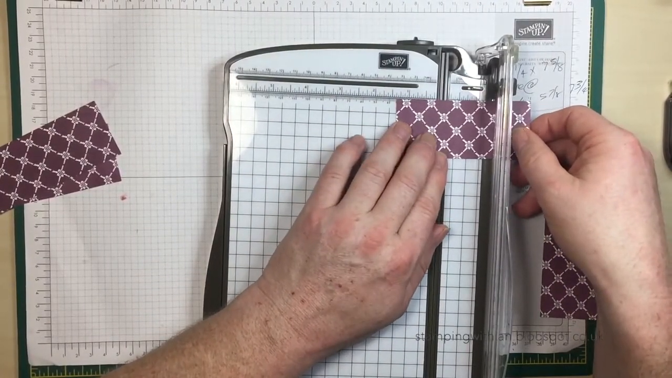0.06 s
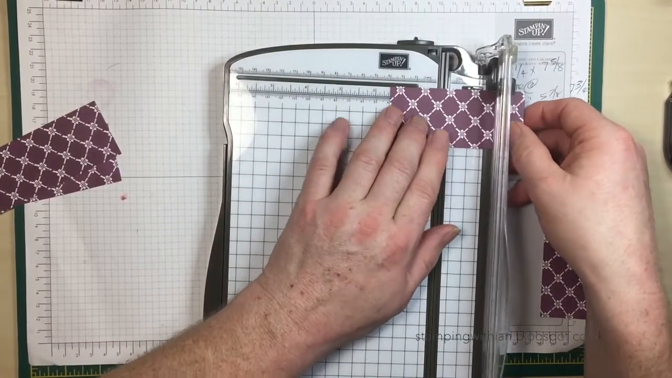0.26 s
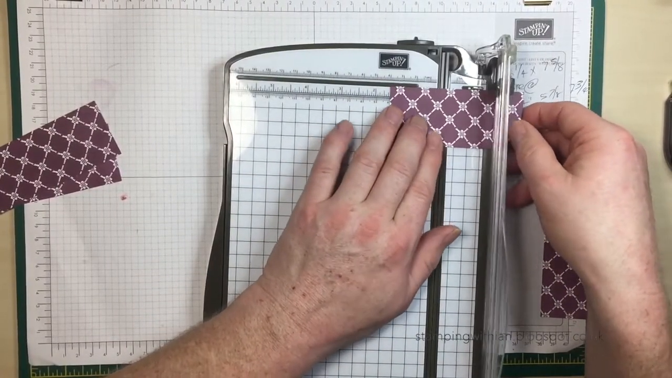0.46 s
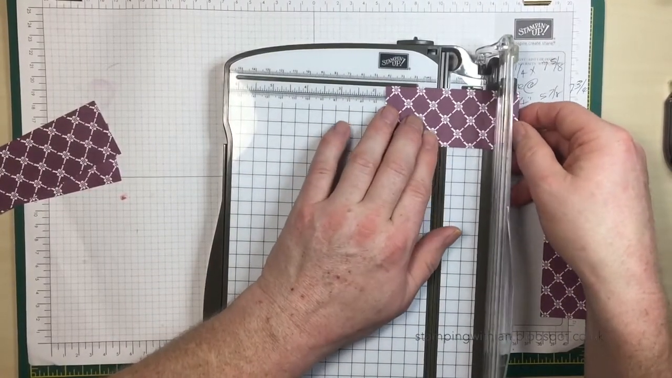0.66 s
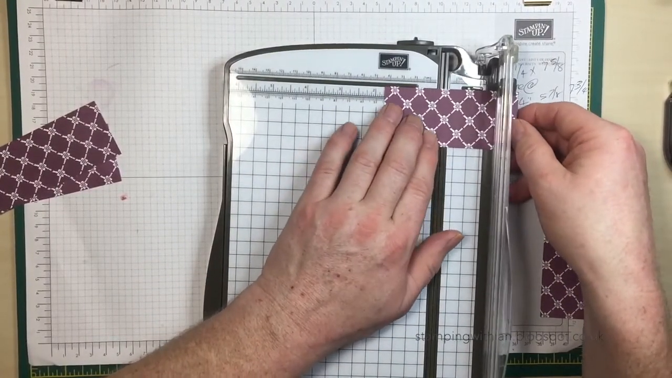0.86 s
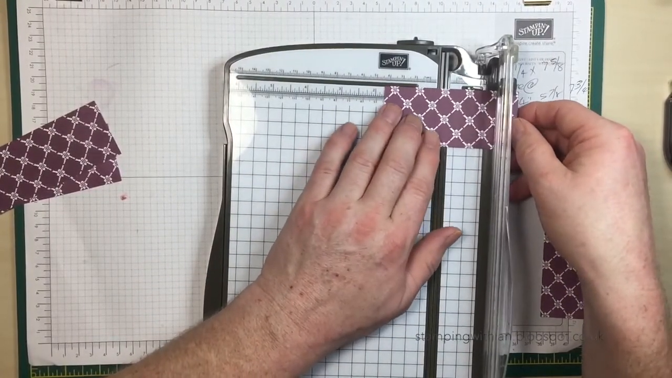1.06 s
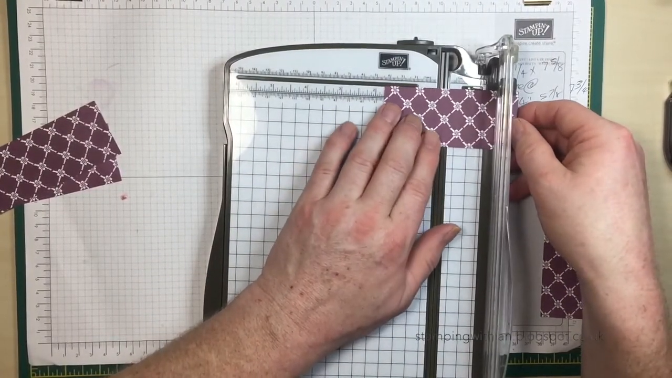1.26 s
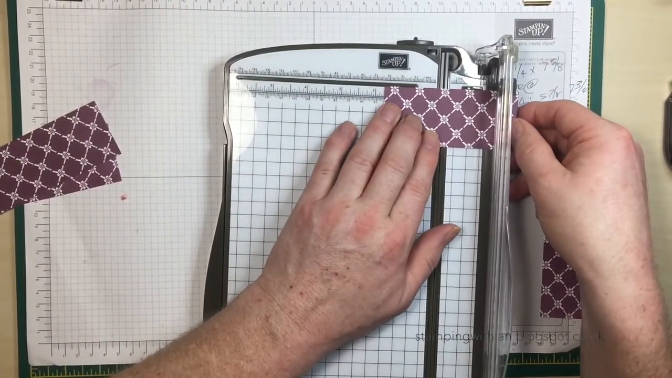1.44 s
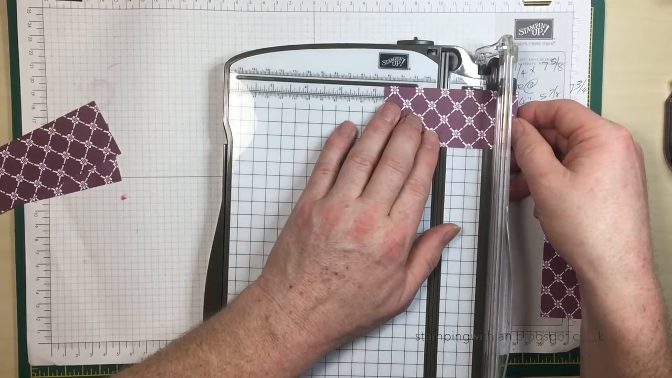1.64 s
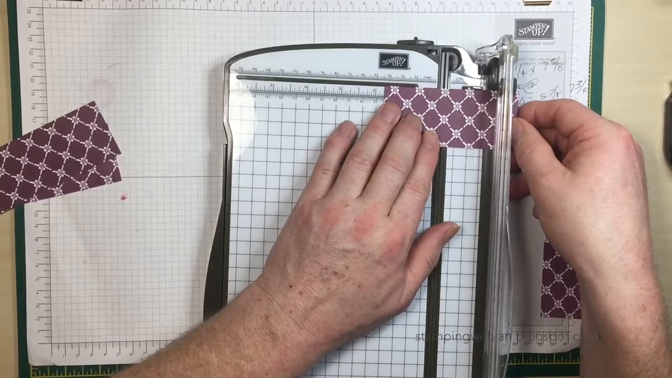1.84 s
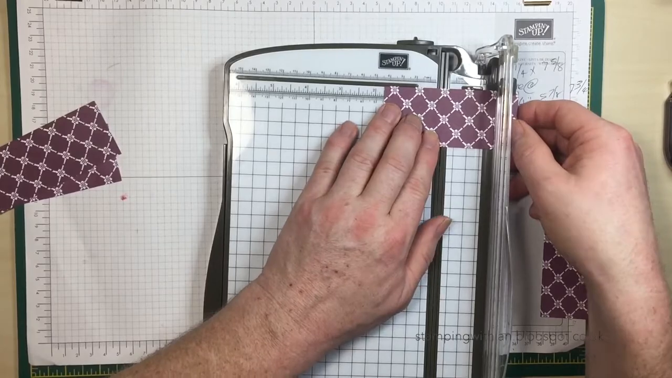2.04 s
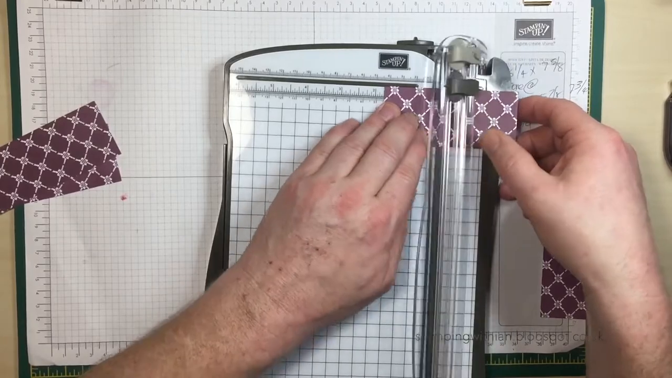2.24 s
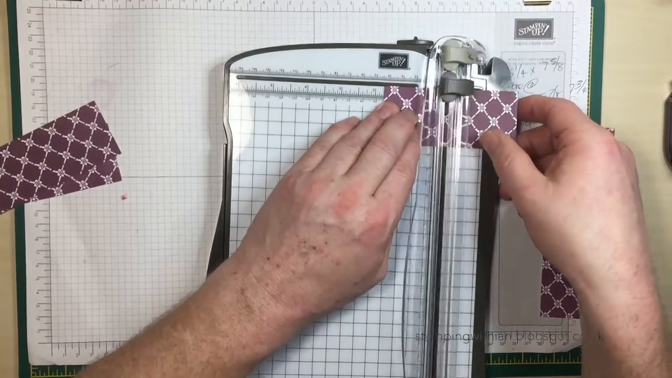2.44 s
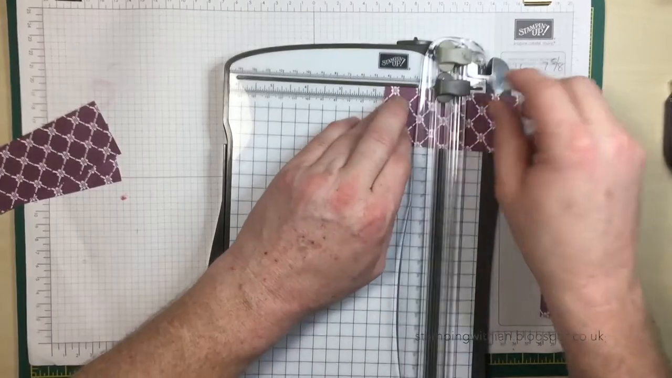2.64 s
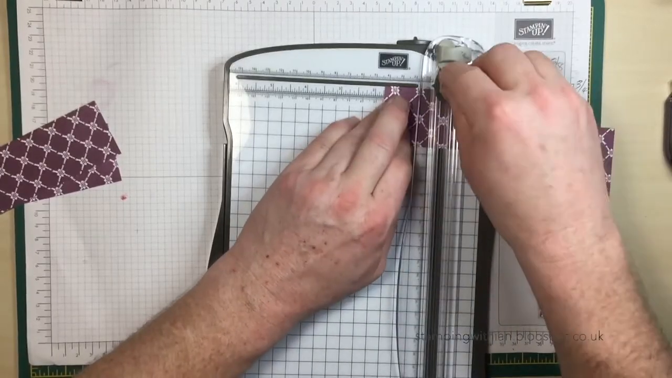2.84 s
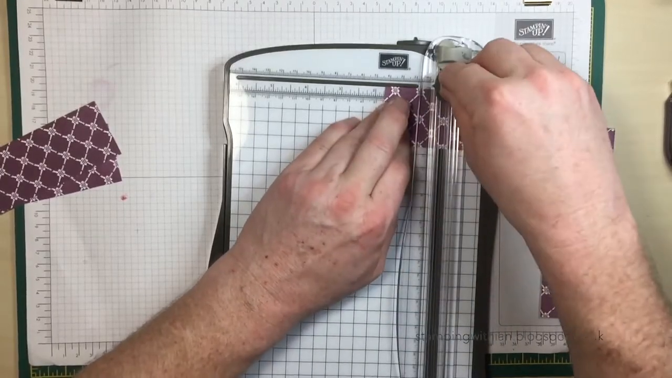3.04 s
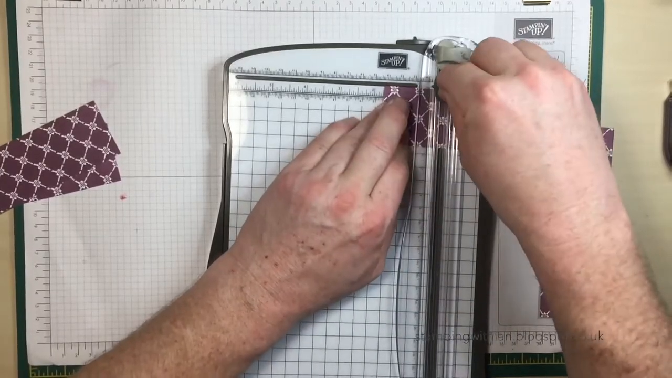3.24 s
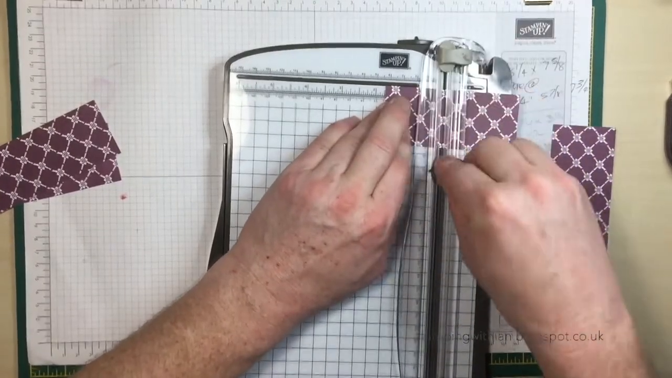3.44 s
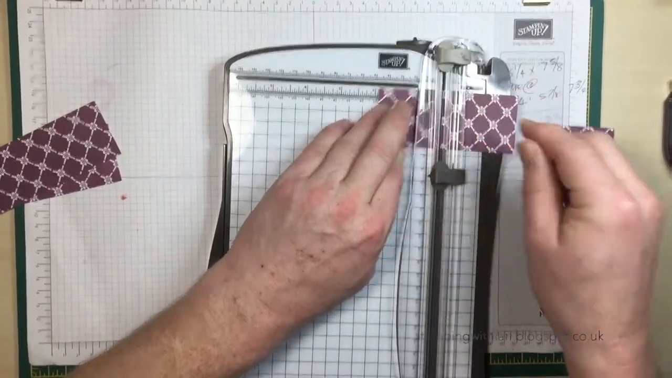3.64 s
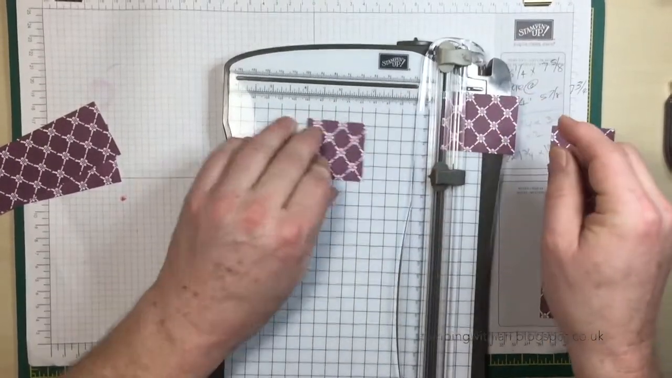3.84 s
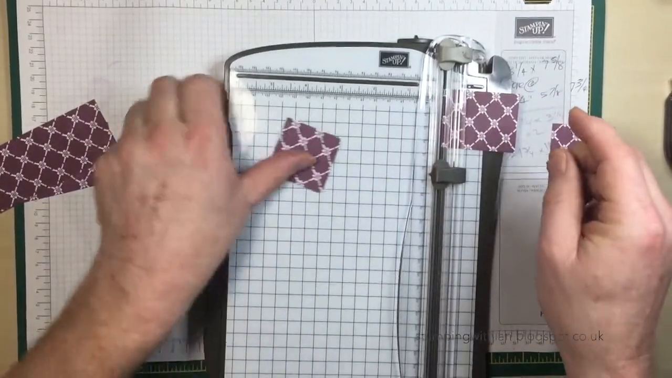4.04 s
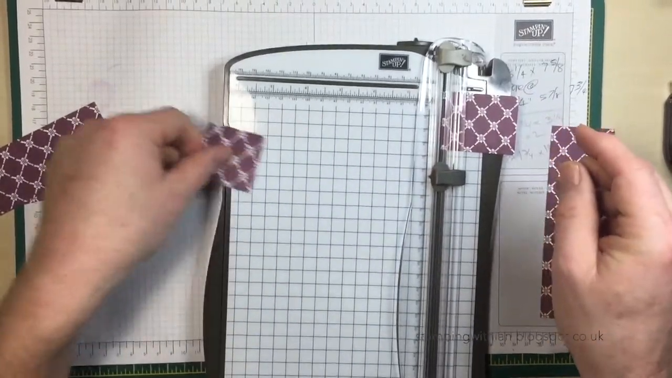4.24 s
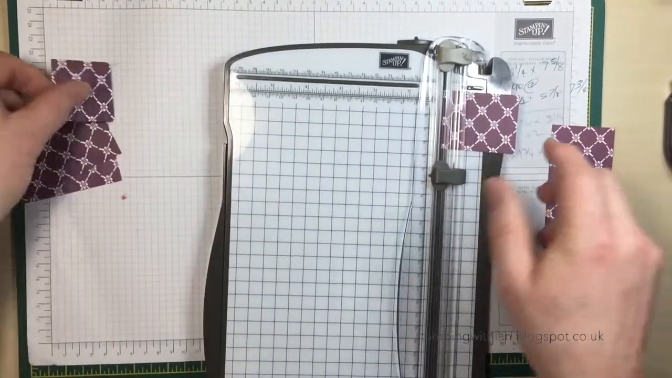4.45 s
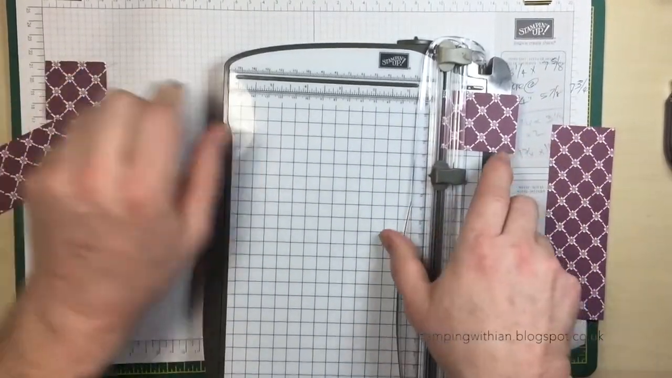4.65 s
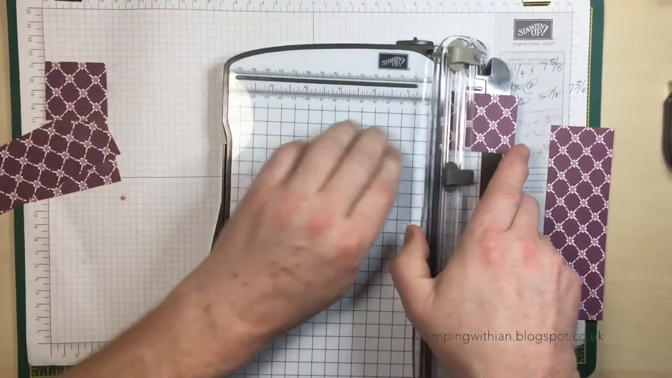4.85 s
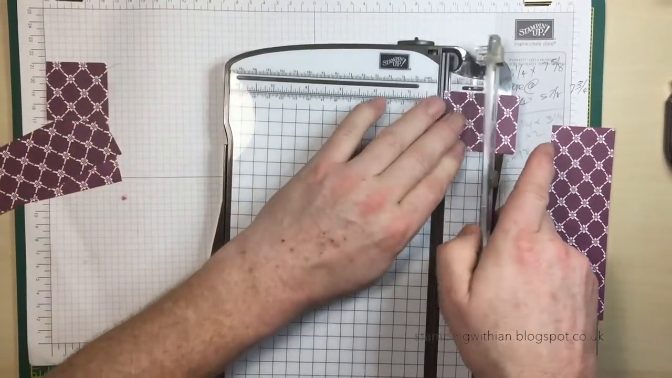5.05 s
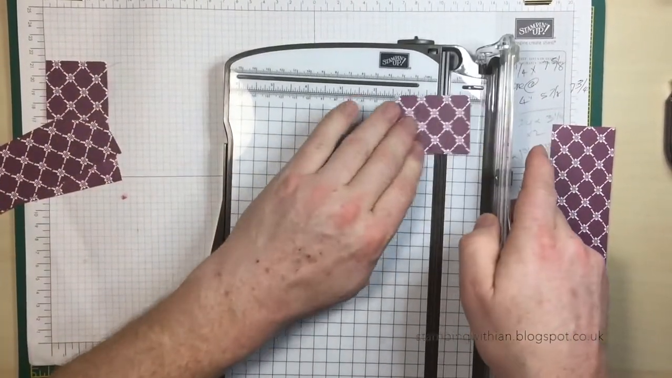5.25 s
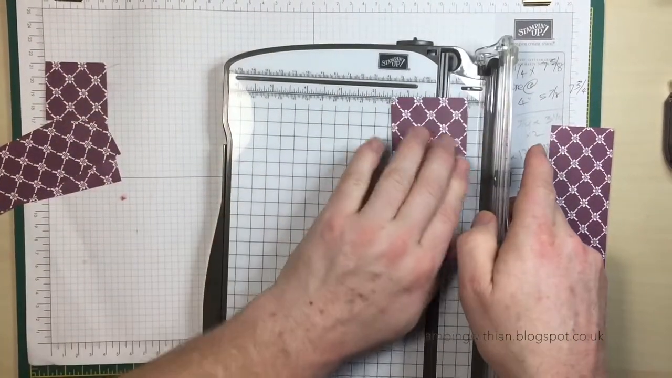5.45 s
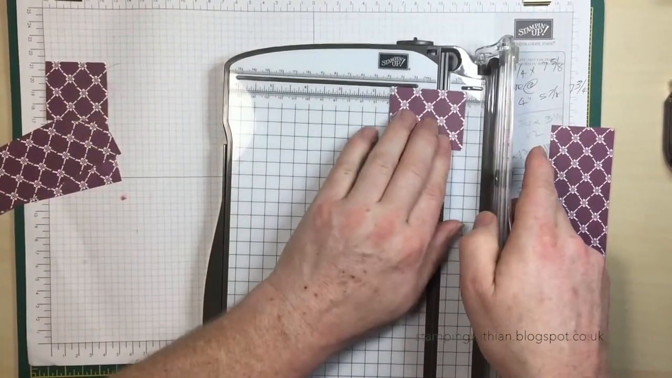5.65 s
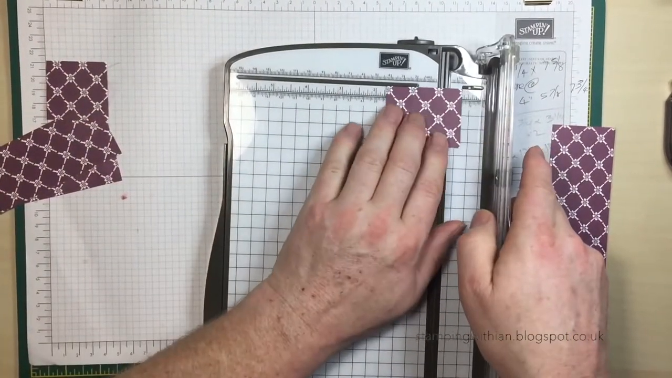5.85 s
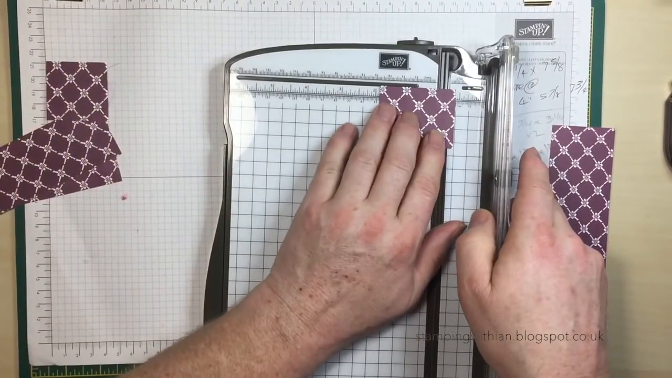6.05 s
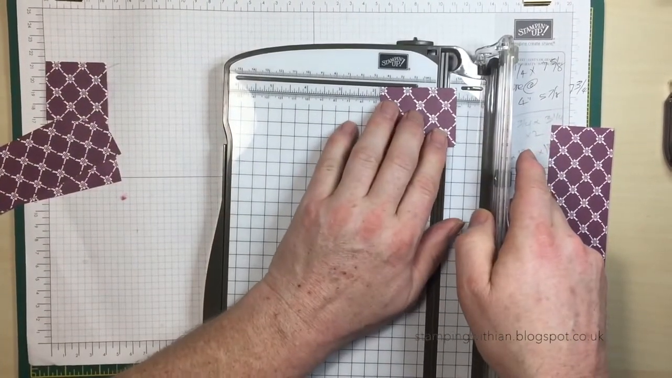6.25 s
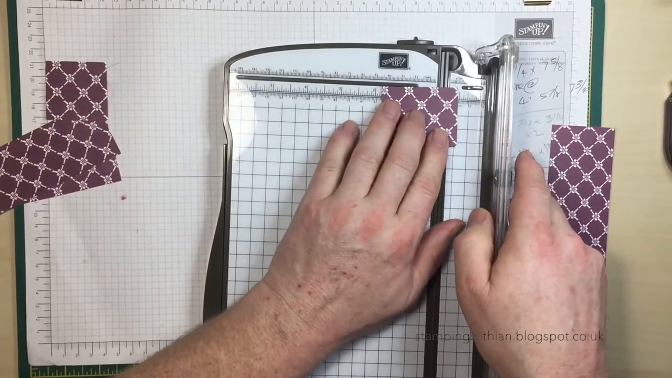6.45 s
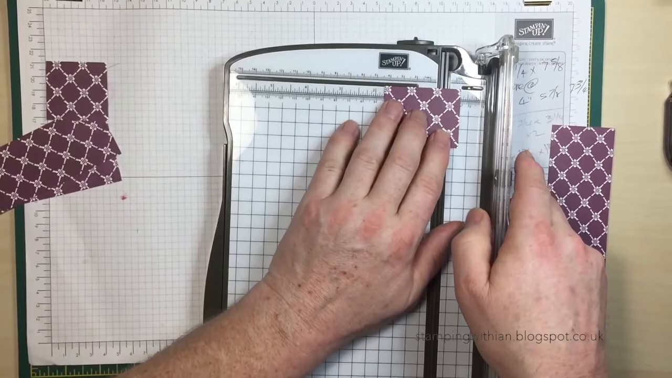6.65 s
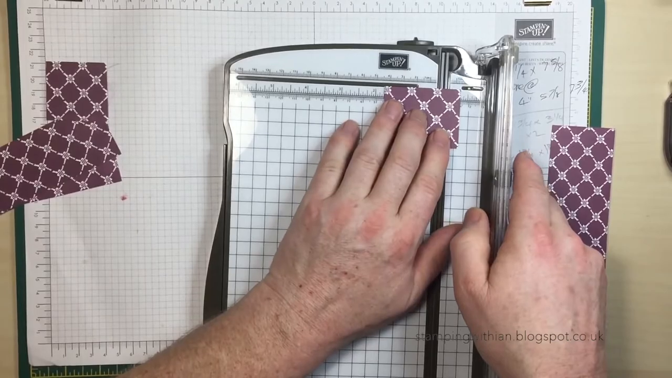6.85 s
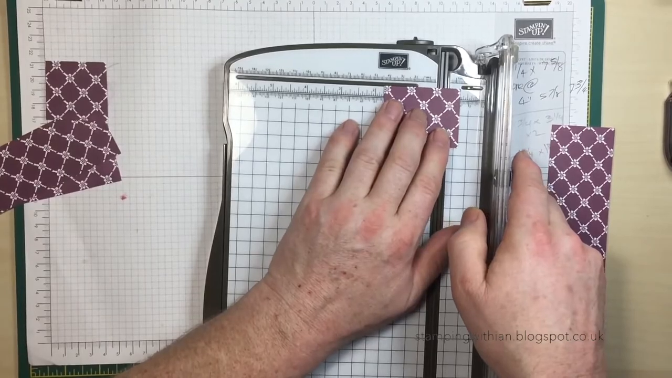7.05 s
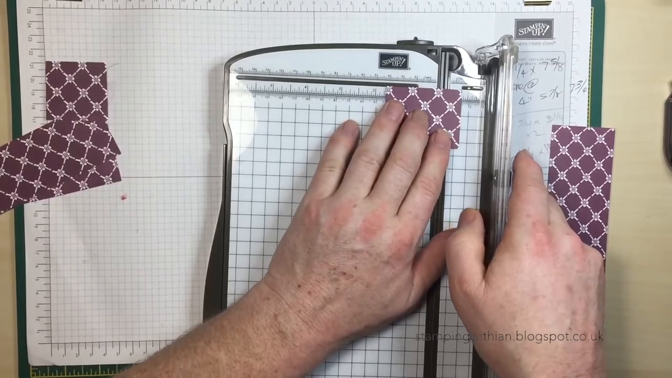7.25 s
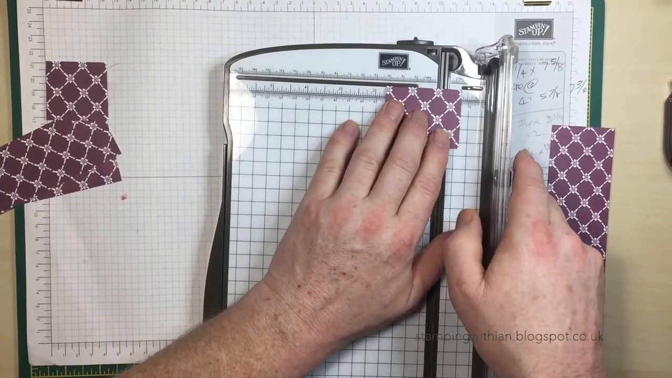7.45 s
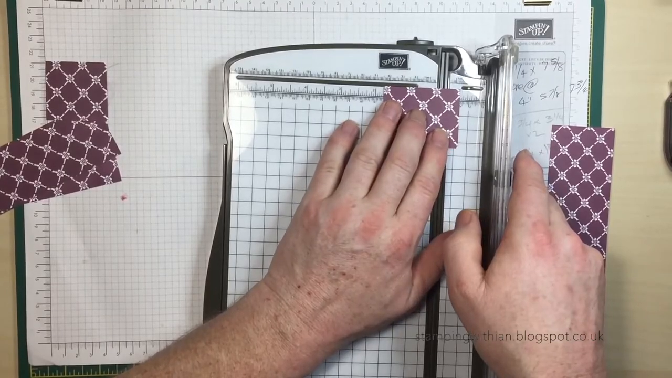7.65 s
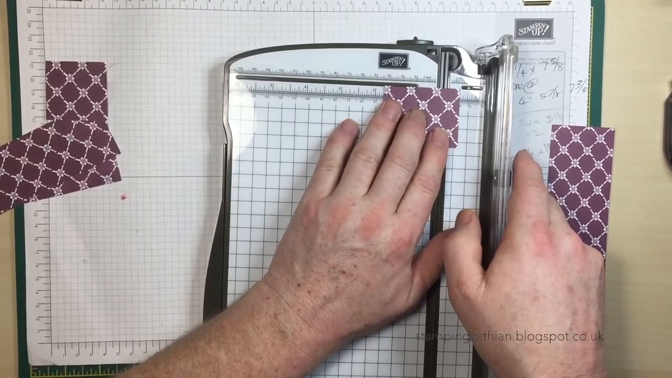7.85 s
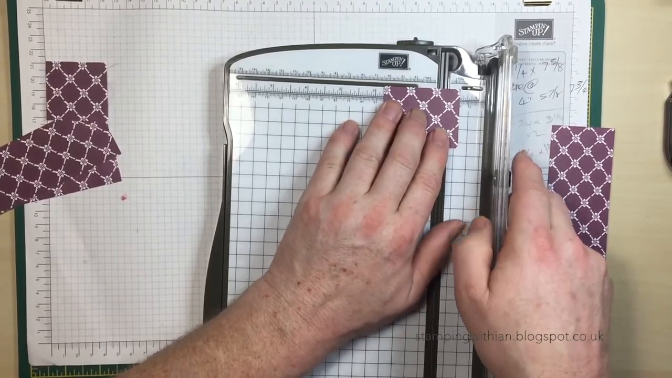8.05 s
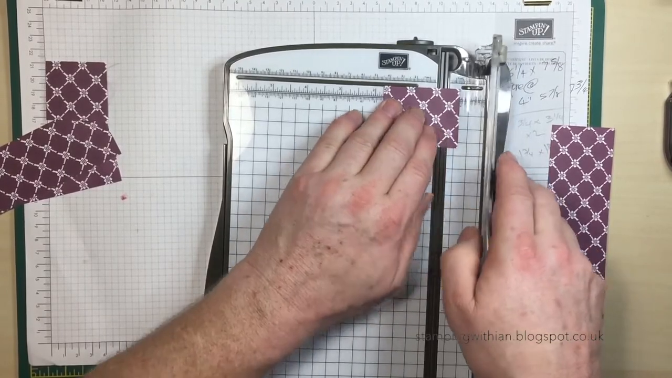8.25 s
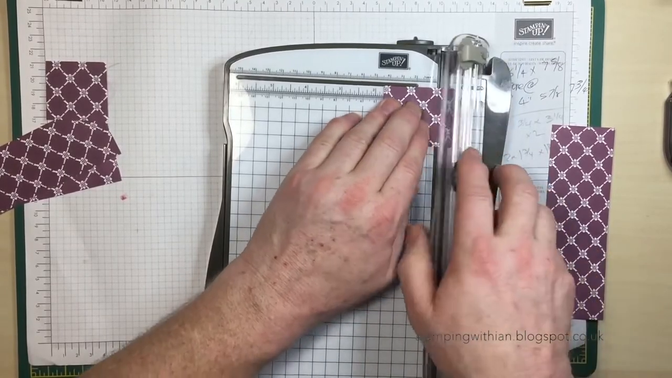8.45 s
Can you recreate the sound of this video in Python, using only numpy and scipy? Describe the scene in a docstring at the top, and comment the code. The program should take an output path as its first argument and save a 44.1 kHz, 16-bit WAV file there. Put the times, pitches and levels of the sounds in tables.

```python
"""A plastic paper trimmer on a craft table in a quiet room: a blade shears through a card along a rail.
Before the cut fingers nudge the card and the rail clacks shut; after it pieces slide and the rail is opened.
Contacts excite the damped modes of base, board, rail and guard with clicks and friction grains; the steel
blade rings, the table top swings and card crackles in puffs of filtered noise. A faint clock ticks once
a second, by noise through a resonance, over shaped noise and wavering sines of the room's hum."""
import sys
import numpy as np
from scipy import signal
from scipy.fft import rfft, irfft, next_fast_len
from scipy.io import wavfile

SR = 44100
rng = np.random.default_rng(int(sys.argv[2]) if len(sys.argv) > 2 else 0)


def unload_audio(sound):
    """Save the sound as a 16-bit wav file, at the path given as the first command line argument."""
    columns = np.transpose(np.atleast_2d(sound))
    # keep every value between -1 and 1, then stretch to whole-number steps
    steps = np.round(np.clip(columns, -1, 1) * 32767)
    wavfile.write(sys.argv[1], SR, steps.astype(np.int16))


N = 374938


def from_db(db):
    """Decibel law: amplitude is ten to the power of a twentieth of the level."""
    return 10 ** (np.asarray(db) / 20)


def rms_one(x):
    """Normalisation to unit mean power."""
    return x / np.sqrt(np.mean(x ** 2) + 1e-30)


def coloured(x, spectrum):
    """Spectral shaping by a (freq_hz, density_db) table; white noise of rms 1 keeps rms 1."""
    freq_hz, density_db = np.transpose(spectrum)
    size = next_fast_len(N)
    bins_hz = np.arange(size // 2 + 1) * SR / size
    gain = from_db(np.interp(np.log(bins_hz + 1), np.log(freq_hz), density_db))
    return irfft(rfft(x, size) * rms_one(gain), size)[:N]


def drift(rate_hz):
    """Low-passed random process: noise through a double pole gives a slow wander of spread 1."""
    step, settle = 40, 2000   # samples per slow point; slow points dropped
    pole = np.exp(-80 * np.pi * rate_hz / SR)
    noise = rng.standard_normal(N // step + 2002)
    slow = signal.lfilter([1], [1, -2 * pole, pole * pole], noise)[settle:]
    return np.interp(np.arange(N) / step, np.arange(len(slow)), rms_one(slow))


def ring(x, freq_hz, t60_s):
    """Damped resonator: a unit click sets a decaying sine of height 1 ringing."""
    radius = from_db(-60 / (t60_s * SR))
    angle = 2 * np.pi * freq_hz / SR
    feedback = [1, -2 * radius * np.cos(angle), radius * radius]
    return signal.lfilter([0, np.sin(angle)], feedback, x + 1e-18)


def bursts(starts_s, level_db, t60_s, rise_s):
    """Transient envelope: a fast exponential rise at each start, then an exponential decay."""
    out, t = np.zeros(N + SR), np.arange(SR // 4) / SR
    shape = (1 - np.exp(-t / rise_s)) * from_db(-60 * t / np.clip(t60_s, .003, .3))
    for start_s, height in zip(starts_s, from_db(level_db)):
        out[round(start_s * SR):][:len(t)] += height * shape
    return out[:N]


def plateaus(starts_s, lengths_s, level_db):
    """Sustained excitation envelope: held for a length, easing off a little, with soft ends."""
    out = np.zeros(N + SR)
    for start_s, length_s, height in zip(starts_s, lengths_s, from_db(level_db)):
        t = np.arange(round((length_s + .018) * SR)) / SR
        ends = np.clip(np.minimum(t / 0.012, (t[-1] - t) / 0.019), 0, 1)
        easing = from_db(1.0 - 5.6 * t / t[-1])
        out[round((start_s - .006) * SR):][:len(t)] += height * ends * easing
    return out[:N]


def grains(per_s, spread_db):
    """Stick-slip friction as a random train of clicks of uneven size and either sign; rms 1."""
    size_db = spread_db * np.minimum(rng.exponential(1, N), 4)
    clicks = from_db(size_db) * rng.choice([-1, 1], N)
    return rms_one(clicks * (rng.random(N) < per_s / SR))


def room_air():
    """Broadband air noise: steady shaped noise whose rumble below 170 Hz comes in lumps."""
    # spectrum of the room's air: freq_hz, density_db (dB per Hz, relative)
    air_spectrum = [(20, -42), (35, -14.5), (50, -3), (76, -10), (137, -8.5), (165, -12.5), (285, -8.5),
                    (384, -22), (440, -15.5), (503, -21.5), (545, -17), (620, -23), (1000, -26.5),
                    (4200, -33.5), (4800, -36.5), (5600, -35), (9500, -39.5), (10500, -43.5),
                    (11500, -39.5), (16000, -44.5)]
    air = from_db(-69) * coloured(rng.standard_normal(N), air_spectrum)
    rumble = signal.lfilter(*signal.butter(2, 170, fs=SR), air)
    return air + rumble * (from_db(2.0 * drift(6.1) - 3.0) - 1)


def hum():
    """Narrow-band tones: low sines whose amplitude and phase wander at random."""
    # wavering tones of the room: freq_hz, level_db (before a common lift)
    tones = [(53.8, -74), (134.6, -80), (236.9, -86)]
    out, t = np.zeros(N), np.arange(N) / SR
    for freq_hz, level_db in tones:
        height = from_db(level_db + 0.5 + 2.1 * drift(3.8))
        out += height * np.sin(2 * np.pi * freq_hz * t + 1.2 * drift(3.5))
    return out


def share_db(k, level_db, place, softness_db):
    """Transmission between coupled parts: the level reaching place k falls with distance from the contact.

    Parts below the contact lose a set step per place, parts above lose the contact's own softness.
    """
    # how readily each part answers, in order of place: response_db
    response_db = [0.16, 1.75, -0.17, -4, 0.3]
    step_below_db = 13.5
    loss_below_db = step_below_db * np.maximum(place - k, 0)
    loss_above_db = softness_db * np.maximum(k - place, 0)
    return level_db + response_db[round(k)] - loss_below_db - loss_above_db


def part(force, modes, blur_db):
    """Modal superposition: a force rings a part's modes, each with a wandering share as the contact moves.

    The many small damped modes in between blur into a plain band.
    """
    out, power = np.zeros(N), 0
    for i, (freq_hz, level_db, t60_s) in enumerate(modes):
        out += (-1) ** i * ring(force * from_db(level_db + 2.0 * drift(20)), freq_hz, t60_s)
        power += from_db(2 * level_db) / (2 - 2 * from_db(-120 / (t60_s * SR)))
    low_hz, top_hz = 0.88 * modes[0][0], 1.19 * modes[-1][0]
    band = signal.butter(2, [low_hz, top_hz], "band", fs=SR, output="sos")
    blur = signal.sosfilt(band, force) * np.sqrt(SR / 2 / (top_hz - low_hz))
    out = out / np.sqrt(power) + from_db(blur_db) * blur   # the modes roughly keep the force's rms
    # little radiates far below the first mode, nor above the last
    out = signal.sosfilt(signal.butter(2, .6 * low_hz, "high", fs=SR, output="sos"), out)
    return signal.sosfilt(signal.butter(4, top_hz, fs=SR, output="sos"), out)


def stroke(k):
    """Moving contact: the blade's stroke as a gain curve for place k, silent before and after."""
    # the stroke bites, brightens as it shears and dulls as it runs out:
    # time_s, level_db, place (0-4), softness_db (dB per part)
    stroke_points = [(3.4, -50, 0.94, 5), (3.418, -39, 1.37, 6.5), (3.445, -42, 2.3, 5.5),
                     (3.47, -42.5, 2.4, 2.5), (3.51, -41, 2.35, 3.5), (3.53, -42, 2.3, 2.5),
                     (3.552, -46, 0.47, 3), (3.588, -57, 0.4, 1.5), (3.61, -70, 1, 3)]
    t = np.arange(N) / SR
    time_s, *columns = np.transpose(stroke_points)
    edge = np.clip(np.minimum(t - time_s[0], time_s[-1] - t) / 0.005, 0, 1)
    return edge * from_db(share_db(k, *[np.interp(t, time_s, column) for column in columns]))


def contacts():
    """Impact and friction excitation: taps push and rattle, rubbing slips unevenly, shearing is finer.

    Places along the parts: 0 hollow base, 1 board, 2 rail, 3 guard, 4 crisp edge.
    """
    # taps and clicks: start_s, level_db, place (0-4), softness_db (dB per part)
    tap_table = [(0.238, -57, 1.6, 10.0), (0.261, -51, 1.3, 11), (0.343, -63.5, 0.7, 5.0),
                 (0.462, -56.5, 1.65, 15), (0.485, -67, 0.2, 3.5), (0.579, -58, 1.0, 17.0),
                 (0.695, -51.0, 0.8, 18.0), (0.917, -45, 1.22, 14), (2.167, -50.5, 1.64, 2.5),
                 (2.248, -49, 1.5, 17), (2.294, -55.5, 0.7, 4), (2.371, -43.5, 0.7, 1),
                 (2.381, -49, -0.5, 7), (2.419, -51.0, 0.8, 0.5), (2.495, -49.5, 1.8, 25),
                 (2.558, -63, 0.0, 10), (2.6467, -25.5, 1.5, 4.5), (2.65, -29.5, 1.2, 1.5),
                 (2.659, -31.5, 0.0, 14.0), (2.807, -52.5, 1.45, 20.5), (2.975, -56.5, 1, -0.5),
                 (2.995, -41, 1.9, 6.5), (3.114, -59.0, 0.8, 3), (3.19, -47.0, 1.7, 13),
                 (3.203, -42.5, 1.5, 15), (3.404, -42.5, 0.74, 3.0), (3.43, -47.5, -0.5, 2.0),
                 (3.529, -30, 1.5, 15), (3.616, -55, 0.6, 5.0), (3.664, -50, 0.9, 5.0),
                 (3.71, -58, 1.4, 11.0), (3.737, -53.5, 2.0, 21), (3.763, -54, 2.0, 24),
                 (3.795, -64.5, 0.2, 2), (3.969, -51.5, 1.8, 9), (4.195, -66.0, 2.5, 6),
                 (4.365, -47.0, 1.47, 5), (4.389, -58.0, 0.5, 9), (4.587, -63, 2.5, 22.5),
                 (4.668, -62.5, 2.5, 13.5), (4.7552, -38.0, 2.0, 3.5), (4.758, -32.5, 1.46, 3.5),
                 (4.89, -56.5, 1.86, 5.0), (5.774, -61.5, 1.3, 7.5), (5.833, -59, 1.5, 13.0),
                 (5.916, -58.5, 1.5, 10.0), (6.04, -52.5, 0.84, 26), (6.164, -56.5, 0.9, 11),
                 (6.339, -50.5, 0.94, 9.0), (8.019, -47, 1.87, 28.0), (8.093, -60.5, 1.3, 13.0),
                 (8.161, -48.5, 1.13, 12), (8.18, -55, 1, 13), (8.288, -53.0, 1.36, 10.5),
                 (8.419, -46, 0.5, 10.0), (8.463, -61.5, 1.0, 12.5)]
    # card, fingers and rail rubbing: start_s, length_s, level_db, place (0-4), softness_db (dB per part)
    scuff_table = [(0.272, 0.056, -64, 1.5, 9.5), (0.523, 0.065, -62, 1.0, 12),
                   (2.224, 0.041, -45, 0.8, 6.5), (2.274, 0.044, -54.5, 2.02, 13),
                   (2.358, 0.031, -43.5, 1.63, 10.5), (2.388, 0.049, -46.5, 1.14, 7),
                   (2.445, 0.043, -48, 1.5, 11.5), (2.479, 0.1, -59, 0.6, 7.0),
                   (2.612, 0.061, -54.5, 0.0, 4.5), (2.675, 0.019, -29, 2.5, 12.5),
                   (2.694, 0.069, -56.0, 1.25, 9), (2.972, 0.058, -51.5, 1, 7.5),
                   (3.084, 0.057, -65, 1.3, 6.0), (3.376, 0.043, -54.5, 0.5, 5.5),
                   (3.618, 0.044, -55.5, 0.76, 5.0), (3.656, 0.046, -54, 0.8, 6),
                   (3.702, 0.075, -67, 0.5, 5), (3.78, 0.026, -72.5, 0.1, -1.5),
                   (3.817, 0.034, -63.5, 0.5, 1.0), (4.024, 0.013, -56.5, 1, 5),
                   (4.056, 0.066, -53, 1.14, 9), (4.202, 0.033, -69, 3.5, 0.0), (4.262, 0.045, -57.5, 3, 6),
                   (4.354, 0.043, -58.5, 0.5, 2.0), (4.439, 0.016, -49.5, 2.5, 13),
                   (4.507, 0.46, -74.5, 2.5, 12), (4.821, 0.12, -68, 2, 5.0),
                   (5.26, 0.067, -59.5, 1.08, 4.0), (5.654, 0.023, -55.5, 1.26, 5.5),
                   (8.133, 0.088, -62.5, 1.1, 6.5), (8.272, 0.045, -61.5, 1.37, 7),
                   (8.397, 0.041, -55, 0.0, 7.0)]
    # modes of the base: freq_hz, level_db (relative), t60_s
    base_modes = [(255, -9, .05), (318, -4, .06), (362, 0, .08), (450, -6, .05)]
    # modes of the board: freq_hz, level_db (relative), t60_s
    board_modes = [(510, -2.5, 0.046), (556, -1, 0.035), (665, 3, .04), (735, 0.5, 0.03), (833, 1, 0.016),
                   (1000, 1, 0.024), (1048, -7, 0.016)]
    # modes of the rail: freq_hz, level_db (relative), t60_s
    rail_modes = [(1167, -1, 0.018), (1365, -3, 0.021), (1610, -7, 0.0083), (1692, -4, 0.019),
                  (1949, 3, 0.024), (2125, 0, 0.017), (2550, -1, 0.016), (2550, -3.5, 0.014),
                  (2930, -9.5, 0.0062)]
    # modes of the guard: freq_hz, level_db (relative), t60_s
    guard_modes = [(3170, 0.5, 0.011), (3620, -2, 0.0075), (3960, -1, 0.028), (4230, -2.5, 0.0096),
                   (4730, -3, 0.014), (5080, -1.5, 0.006), (6270, -3.5, 0.011), (6550, -4, 0.019),
                   (7000, -7.5, 0.0065)]
    # spectrum of the crisp edge: freq_hz, density_db (dB per Hz, relative)
    edge_spectrum = [(5000, -26), (7000, 1.5), (9000, -2.5), (10500, -7), (13000, -5), (15000, -8.5),
                     (17000, -25.5)]
    # the board's lower and upper modes lie either side of place 1: place
    board_places = [0.83, 1.264]

    tap_s, *tap_columns = np.transpose(tap_table)
    scuff_s, scuff_length_s, *scuff_columns = np.transpose(scuff_table)
    rattle = grains(9000, 0.63)
    slips = grains(3000, 3.5) * from_db(2.2 * drift(90) - 2.5)
    shear = grains(9000, 2.3) * from_db(1.86 * drift(80) - 4.0)

    def force(k, push_db, rattle_db, length_ratio, rise_s):
        """Summed excitation at place k: push, rattle, rubbing and shearing."""
        tap_db = share_db(k, *tap_columns)
        push = np.zeros(N)
        push[np.round((tap_s + rise_s) * SR).astype(int)] = from_db(tap_db + push_db)
        rattle_t60_s = length_ratio * 0.024
        knock = bursts(tap_s, tap_db + rattle_db, rattle_t60_s, rise_s)
        rub = plateaus(scuff_s, scuff_length_s, share_db(k, *scuff_columns))
        return push + rattle * knock + slips * rub + shear * stroke(k)

    base = part(force(0, 27, 8.5, 1.2, .002), base_modes, -6.5)
    board = np.zeros(N)
    for place, modes in zip(board_places, (board_modes[:4], board_modes[4:])):
        board += from_db(-2.0) * part(force(place, 25, 6, 1.05, .0015), modes, -5.0)
    rail = part(force(2, 13, 8.75, 0.99, .0015), rail_modes, -4.5)
    guard = part(force(3, 15, 8.5, 0.99, .0014), guard_modes, -1.4)
    edge = coloured(force(4, 11, 6.2, .6, .0004), edge_spectrum)
    return base + board + rail + guard + edge


def blade():
    """Resonance: noise drives unsteady whistles and a low hum, jolts ring two close modes of the steel."""
    # whistles of the blade carriage and card edges, and the base's low hum as the blade slides:
    # start_s, length_s, pitch_hz, level_db (of the drive, before a common cut)
    squeaks = [(3.425, 0.028, 1960, -56), (3.445, 0.042, 2600, -51), (3.45, 0.017, 7400, -53),
               (3.46, 0.043, 5900, -50), (3.49, .02, 5100, -55), (3.445, .045, 327, -47.5),
               (4.2, 0.019, 3100, -62.5), (5.26, 0.084, 2060, -65), (3.367, .015, 2100, -63.5)]
    # jolts of the steel blade: start_s, level_db
    jolts = [(.262, -67), (2.651, -27), (3.737, -74.5), (8.14, -66.5)]
    steel_hz, steel_t60_s = 6794, .07
    tones, strike = np.zeros(N), np.zeros(N)
    shiver = rng.standard_normal(N)
    for start_s, length_s, pitch_hz, level_db in squeaks:
        drive = shiver * plateaus([start_s], [length_s], [level_db - 14])
        tones += ring(drive, pitch_hz, .014 + 12 / pitch_hz)
    for start_s, level_db in jolts:
        strike[round(start_s * SR)] = from_db(level_db)
    steel = ring(strike, steel_hz, steel_t60_s) + .5 * ring(strike, steel_hz + 45, steel_t60_s)
    return tones + steel


def reflections(x):
    """Diffuse reverberation: table and walls answer with a dense, dull, decaying noise tail."""
    t = np.arange(SR // 3) / SR
    tail = rng.standard_normal(len(t)) * from_db(-60 * t / .16) * (t > .004)
    tail = signal.lfilter([.3], [1, -.7], tail)
    return signal.fftconvolve(x, tail / np.sqrt(np.sum(tail ** 2)))[:N]


def thumps():
    """Low plate modes: a soft push swings the table top a few cycles, most in the mode it favours."""
    # hands and rail shaking the table: start_s, level_db (before a common lift), favoured_mode (0-5)
    pushes = [(.463, -62, .1), (.916, -55, 3.8), (1.092, -57, 2.8), (2.241, -53, 4.1), (2.374, -44.5, 3.9),
              (2.388, -54, 1.9), (2.644, -42.5, 3.1), (2.648, -47, .9), (2.801, -54, 1.9),
              (2.983, -55, 3.6), (3.19, -58.5, 1.2), (3.404, -53, 2.3), (3.421, -56.5, .3),
              (3.524, -48, 4.1), (4.096, -51, 4.9), (4.739, -56.5, .1), (4.754, -49, 3.1),
              (5.074, -59, 1.9), (5.25, -50, 1.1), (5.646, -57, .1), (5.65, -49.5, 2.7), (8.099, -58, .1),
              (8.32, -61.5, .4), (8.459, -57.5, .2)]
    # modes of the table top: freq_hz, t60_s
    table_modes = [(58, .24), (74, .24), (92, .2), (120, 0.16), (145, .12), (190, .1)]
    step_away_db = 12   # loss per mode away from the favoured one
    out, t = np.zeros(N + SR), np.arange(SR // 3) / SR
    rise = 1 - np.exp(-t / 0.0074)
    swings = np.array([np.sin(2 * np.pi * freq_hz * t) * rise * from_db(-60 * t / t60_s)
                       for freq_hz, t60_s in table_modes])
    for start_s, level_db, favoured in pushes:
        distance = abs(np.arange(len(table_modes)) - favoured)
        out[round(start_s * SR):][:len(t)] += from_db(level_db + 5 - step_away_db * distance) @ swings
    return out[:N]


def clock():
    """Resonant filtering: a short puff of noise each second rings a single mode."""
    first_s, pitch_hz = .525, 877
    drive_db = -75.5 - 13.5
    envelope = plateaus(first_s + np.arange(8), np.full(8, .03), np.full(8, drive_db))
    return ring(rng.standard_normal(N) * envelope, pitch_hz, 0.048)


def crackles():
    """Band-limited impulse noise: each crackle is a sharp puff through a broad resonance of its own."""
    # crackles of card and fingertips: start_s, level_db (before a common cut), centre_hz
    crackle_table = [(2.2218, -52, 5200), (2.2548, -45.5, 5700), (2.4168, -35.5, 12800),
                     (2.4394, -53, 10800), (2.48, -38, 12400), (2.6495, -9.5, 6600), (3.4044, -33.5, 5450),
                     (3.8243, -44, 9850), (4.0966, -58, 5840), (4.1974, -59, 5980), (4.2118, -55, 6570),
                     (4.4456, -50, 6000), (4.691, -62.5, 5250), (4.8858, -48, 5220), (5.6417, -53, 7700)]
    out, t = np.zeros(N), np.arange(SR // 20) / SR
    decay = from_db(-60 * t / .006) + 0.086 * from_db(-60 * t / 0.14)   # sharp puff, weak tail
    for start_s, level_db, centre_hz in crackle_table:
        puff = rng.standard_normal(len(t)) * decay
        band = signal.butter(2, [centre_hz / 2.3, min(1.7 * centre_hz, 15500)], "band", fs=SR)
        out[round(start_s * SR):][:len(t)] += from_db(level_db - 0.5) * signal.lfilter(*band, puff)
    return out


def scene():
    """Superposition: near sounds with their reflections, the table top and the room, in one channel."""
    near = contacts() + blade() + crackles()
    room = room_air() + hum() + clock()
    return (near + from_db(-15) * reflections(near) + thumps() + room)[None]


def record(dry):
    """Low-pass filtering: the treble is 60 dB down from the stop-band edge upward."""
    stop_hz = 16700
    return signal.sosfilt(signal.cheby2(12, 60, stop_hz, fs=SR, output="sos"), dry)


dry = scene()
out = record(dry)
unload_audio(out)
```